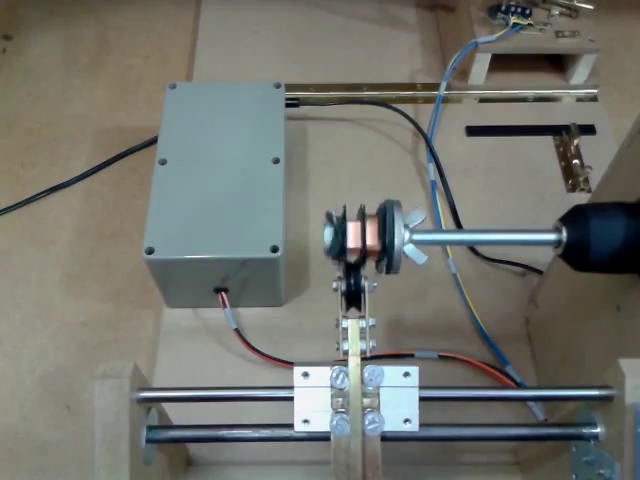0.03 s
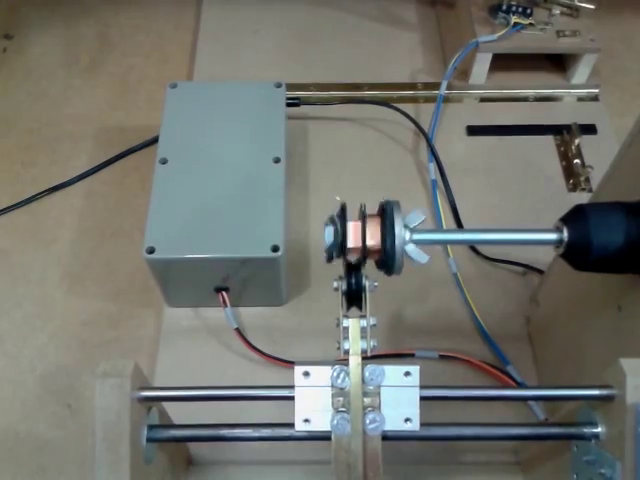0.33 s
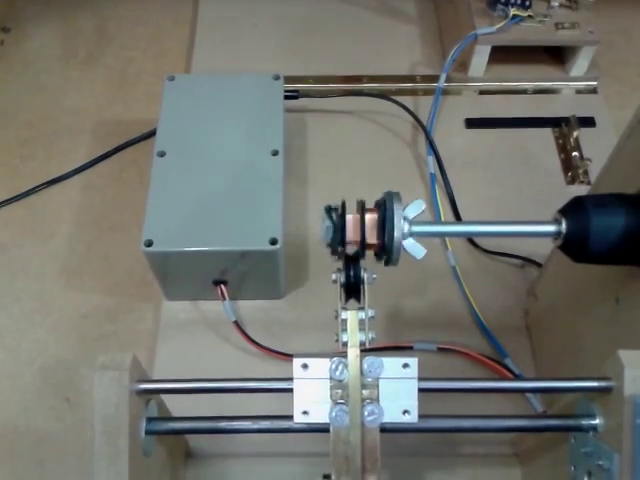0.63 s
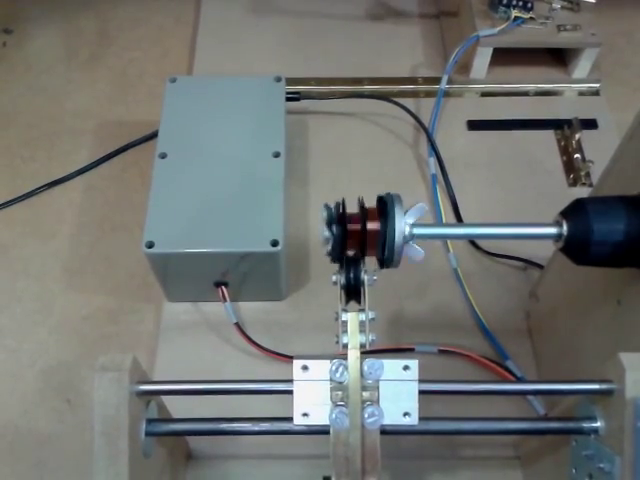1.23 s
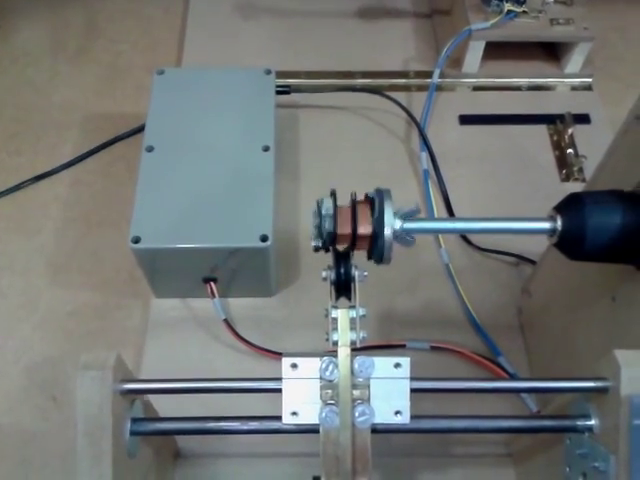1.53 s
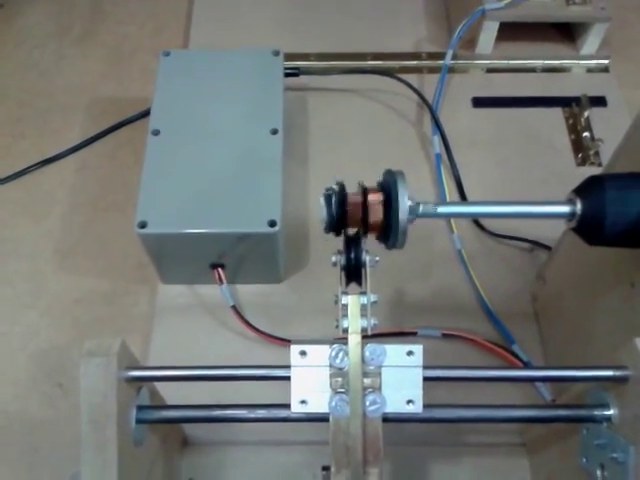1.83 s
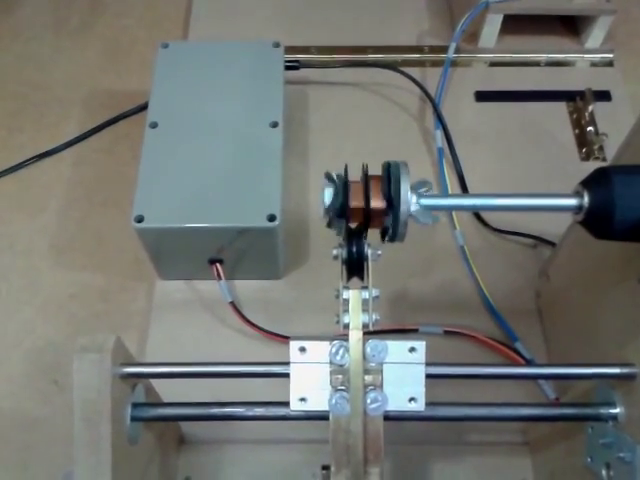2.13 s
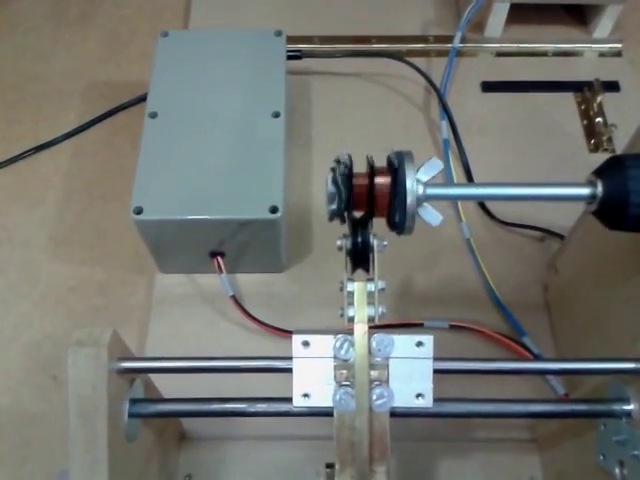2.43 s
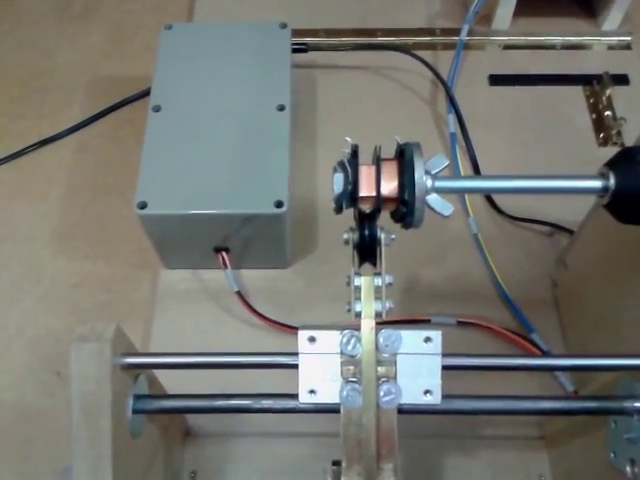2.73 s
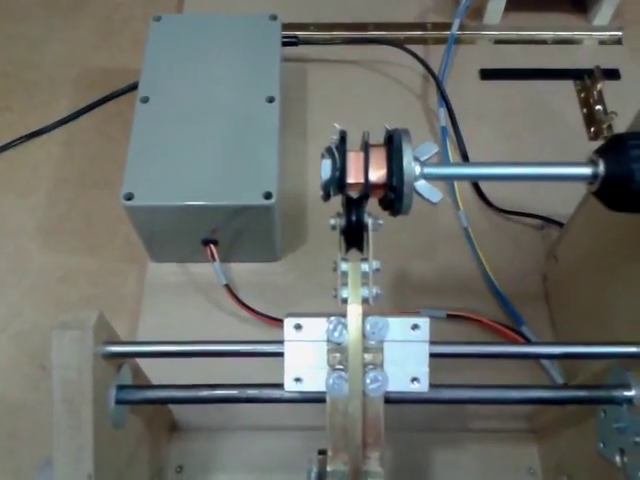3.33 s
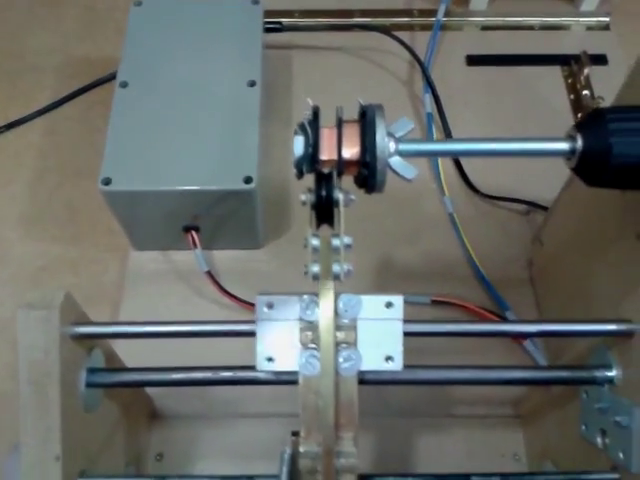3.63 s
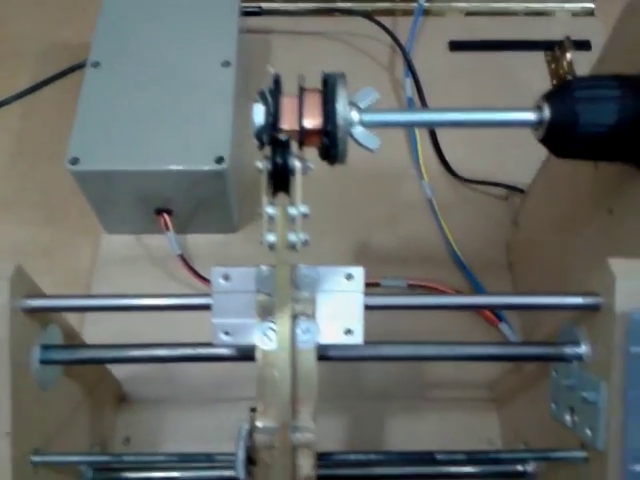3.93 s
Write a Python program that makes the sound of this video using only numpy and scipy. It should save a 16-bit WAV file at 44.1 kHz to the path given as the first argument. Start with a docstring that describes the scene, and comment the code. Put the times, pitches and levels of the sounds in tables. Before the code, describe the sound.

Close up in a small room, an electric drill whirs with gear rattle and hiss while winding wire. Its pitch drops step by step until it stops, then the mechanism clicks lightly a few times over quiet hum.

```python
"""An electric drill turns a coil bobbin in a wooden winding frame, slowing in steps, then running down.
Heard close up on one microphone in a small room: the motor whines, and gear teeth rattle and brushes
hiss through the resonances of housing and frame. The bobbin bumps round and the wire scrapes onto it.
Afterwards the stopped mechanism clacks and ticks a few times over the hum and hiss of the room."""
import sys
import numpy as np
from scipy import signal
from scipy.fft import rfft, irfft
from scipy.io import wavfile

SR = 44100
rng = np.random.default_rng(int(sys.argv[2]) if len(sys.argv) > 2 else 0)


def dump(signal):
    """Clip the signal to [-1, 1] and save it as 16-bit WAV at the path in sys.argv[1]."""
    limited = np.clip(np.atleast_2d(signal).T, -1, 1)
    pcm = np.round(limited * 32767).astype(np.int16)
    wavfile.write(sys.argv[1], SR, pcm)


N = 176400
T = np.arange(N) / SR

# The motor slowing. Each row: time in seconds, turns per second.
MOTOR_SPEED = [(0, 462), (.3, 460), (.41, 444), (.51, 421), (.65, 408), (.8, 409), (.97, 405), (1.08, 394),
               (1.2, 379), (1.33, 373), (1.72, 372), (1.82, 354), (1.95, 342), (2.41, 339), (2.48, 320),
               (2.56, 265), (2.7, 110)]
# Resonances of housing and frame, with narrow dips from where the microphone stands.
# Each row: centre in Hz, width in Hz, boost in dB.
BODY_RESONANCES = [(341.8, 47, 8.5), (415.4, 30, 2.5), (473, 33, -10.5), (544.7, 7.5, 9), (600.6, 23, 8),
                   (760, 82, 10.5), (810, 43, 5.5), (869, 87, 11), (1294, 63, 10.5), (1350, 6.7, -10),
                   (1438, 178, 8.5), (1523, 45, -7), (1720, 100, 7.5), (1843, 91, 9), (2270, 42, 1),
                   (2648, 52, 7), (2820, 60, 6), (3090, 180, 0), (3420, 40, 9)]
# Motor and gear tones. Each row: multiple of the motor speed, relative level in dB.
TONE_ORDERS = [(.4, -12.5), (.8, -14), (1.6, -17.5), (1.8667, -18), (3.1333, -24.5), (4.9333, -17.5),
               (5.2667, -26), (6, -13), (7, -17.5), (7.9333, -14)]

# How each whine swells and fades. Each row: time in seconds, level in dB.
MAIN_WHINE = [(0, -46), (.38, -35), (.45, -33), (.6, -28.5), (.68, -35.5), (.8, -30), (.97, -34),
              (1.05, -38.5), (1.13, -31.5), (1.38, -35), (1.5, -31.5), (1.7, -34.5), (1.82, -40),
              (1.95, -60), (2.48, -46)]
BEATING_WHINE = [(0, -41), (.36, -39), (.56, -56), (.72, -34), (.83, -54), (.95, -33), (1.2, -55),
                 (1.55, -40), (1.72, -47), (1.8, -57)]
MESH_DRONE = [(0, -41), (.33, -37), (.48, -49), (1.1, -51.5), (1.25, -48), (1.7, -47), (1.79, -35.5),
              (1.95, -42.5), (2.2, -39.5), (2.46, -42), (2.52, -46)]
GEAR_HUM = [(0, -49.5), (.3, -40.5), (.5, -53), (1.0, -57), (1.15, -45.5), (1.62, -43.5), (1.92, -52),
            (2.05, -47), (2.3, -42.5), (2.46, -56)]
MOTOR_HUM = [(.35, -45.5), (.45, -47.5), (.92, -41.5), (1.08, -43), (1.25, -66), (1.7, -56), (1.82, -44.5),
             (2.46, -41.5), (2.5, -50)]
THIRD_HARMONIC = [(.38, -45), (.46, -33), (.53, -48), (.82, -41), (.92, -51), (1.08, -48), (1.2, -52),
                  (1.65, -48), (1.85, -48)]
FOURTH_HARMONIC = [(.17, -51), (.3, -59), (.54, -57), (.61, -39.5), (.74, -47), (.81, -39), (.93, -61),
                   (1.04, -42), (1.15, -51), (2.45, -56)]
FIFTH_HARMONIC = [(.55, -49), (.62, -52), (.84, -40.5), (.95, -53), (1.15, -57), (1.23, -48), (1.9, -47.5),
                  (2.01, -43), (2.1, -72), (2.28, -43.5), (2.5, -47)]

# How hard each part sounds into housing and frame. Each row: time in seconds, relative level in dB.
TONE_LEVEL = [(.25, -34), (.6, -40), (1.5, -40), (1.8, -42.5), (2.45, -44.5), (2.52, -43)]
GEAR_LEVEL = [(0.0, -32.5), (1.12, -32.5), (1.13, -34.5), (1.56, -32), (1.81, -33), (2.38, -32.5),
              (2.64, -38.5), (2.7, -48)]
COAST_LEVEL = [(2.42, -68), (2.47, -43), (2.53, -47), (2.61, -49)]
BRUSH_LEVEL = [(0, -38), (.25, -36), (.9, -40), (2.42, -39.5), (2.56, -42), (2.63, -70), (2.7, -82)]

# The spectrum of each noise. Each row: frequency in Hz, relative density in dB.
GEAR_COLOUR = [(30, -30), (60, -6.5), (82, -19), (190, -17.5), (265, -15), (320, 2.5), (480, -3),
               (1000, -0.5), (1900, 0), (3000, -1), (4300, -5), (6300, -9.5), (7500, -23), (11000, -89)]
COAST_COLOUR = [(200, -28), (320, -1), (520, 3.5), (720, -8), (880, -3.5), (1050, -17), (2000, -34.5)]
BRUSH_COLOUR = [(1500, -7.5), (3500, -1.5), (4700, -2), (5250, 7.5), (5700, 6.5), (6250, 3), (7000, -5),
                (8200, -17), (9400, -14.5), (11000, -32.5), (15000, -28), (17000, -72)]
BOBBIN_COLOUR = [(25, -24), (58, -9.5), (82, -14), (110, -6.5), (200, -8.5), (330, -6), (600, 6.5),
                 (1200, -43)]
SCRAPE_COLOUR = [(500, -21), (1500, -11), (2700, 4), (5000, -7), (7000, -13), (11000, -42)]
CLACK_COLOUR = [(500, -12), (2400, 7), (4200, 5.5), (6300, 0), (8000, -15), (14000, -24)]
ROOM_COLOUR = [(25, -14), (50, -15.5), (125, -15.5), (200, -7.5), (270, -15), (320, -15.5), (410, -5),
               (490, -11), (600, -9.5), (930, -10.5), (1600, -9.5), (2000, -17), (4100, -15.5), (5400, -19),
               (7500, -29), (17000, -34)]

# Wire scraping on the bobbin. Each row: centre in seconds, length in seconds, relative level in dB.
WIRE_SCRAPES = [(0.809, 0.021, -33), (2.132, 0.066, -36.5)]
# The gears settling. Each row: start in seconds, level of the crack in dB, of the frame's knock in dB.
GEAR_CLACKS = [(2.733, -42, -42.5), (2.793, -37.5, -67)]
# Light metal ticks. Each row: start in seconds, relative level in dB.
METAL_TICKS = [(2.731, -47), (3.031, -50), (3.11, -40)]
# Their ring. Each row: frequency in Hz, relative level in dB, seconds to fall by 60 dB.
TICK_MODES = [(5360, 2, 0.048), (5400, -22, .12), (5420, -10, .025), (5900, -3, .03), (6600, -6, 0.018),
              (6650, -12, .02)]
# Hum in the room. Each row: frequency in Hz, level in dB.
ROOM_HUM = [(317, -59), (947, -62), (1211, -62.5)]

GEAR_CYCLE_TURNS, CONTACTS_PER_CYCLE = 15, 120


def drill(speed_jitter=.002):
    """The drill, close up: one motor speed drives tones, gears, brushes, bobbin and whines."""
    speed = in_time(MOTOR_SPEED) * (1 + speed_jitter * drift(13))
    turns = np.cumsum(speed) / SR
    return body(tones(turns) + gears(turns) + brushes(turns) + wire() + bobbin(turns)) + whines(turns)


def whines(turns):
    """The firm main whine and drone among rougher tones; neighbours beat once per gear cycle."""
    slip = 1 / GEAR_CYCLE_TURNS
    firm = [(MAIN_WHINE, 2), (BEATING_WHINE, 2 - slip), (MESH_DRONE, 6 / 5)]
    rough = [(GEAR_HUM, 1 - slip), (MOTOR_HUM, 1),
             (THIRD_HARMONIC, 3), (FOURTH_HARMONIC, 4), (FIFTH_HARMONIC, 5)]
    return (sum(whine(turns, level, order, flutter_db=2.1) for level, order in firm)
            + sum(whine(turns, level, order, flutter_db=3.2) for level, order in rough))


def whine(turns, level, order, flutter_db):
    """A wavering tone at `order` times the motor speed."""
    waver = rms_one(from_db(flutter_db * drift(25)))
    return running(level) * waver * np.sqrt(2) * np.sin(2 * np.pi * (order * turns + rng.random()))


def tones(turns, flutter_db=4.5, low_cut_hz=249):
    """Wavering motor and gear tones that fall with the speed and die as the power goes off."""
    out = np.zeros(N)
    for multiple, db in TONE_ORDERS:
        order = np.round(multiple * GEAR_CYCLE_TURNS) / GEAR_CYCLE_TURNS  # whole waves per gear cycle
        gain = from_db(db + flutter_db * drift(27))
        out += gain * np.sin(2 * np.pi * (order * turns + rng.random()))
    return running(TONE_LEVEL) * np.sqrt(2) * cut(out, 4, low_cut_hz, "high")


def gears(turns, click_db=5, rub_pulsing=.099, loaded_db=-3, flicker_db=1.22):
    """Teeth click and rub under load, then chatter in their play as the motor coasts."""
    rattle = from_db(click_db) * tooth_clicks(turns) + pulsing_noise(turns, rub_pulsing)
    gain = running(GEAR_LEVEL) * from_db(loaded_db + flicker_db * drift(12))
    loaded = gain * colour(frame_echo(rattle), GEAR_COLOUR)
    coasting = running(COAST_LEVEL) * colour(rattle, COAST_COLOUR)
    return loaded + coasting


def tooth_clicks(turns, spread_db=1.8, scatter_db=1.3):
    """Uneven teeth click in a pattern that repeats each gear cycle; rms 1."""
    offset = rng.random(CONTACTS_PER_CYCLE)
    size = from_db(spread_db * rng.standard_normal(CONTACTS_PER_CYCLE))
    size *= rng.choice([-1, 1], CONTACTS_PER_CYCLE)
    passed = turns / GEAR_CYCLE_TURNS * CONTACTS_PER_CYCLE
    contact = np.arange(int(passed[-1]) - 1)
    tooth = contact % CONTACTS_PER_CYCLE
    clicks = np.zeros(N)
    clicks[np.searchsorted(passed, contact + offset[tooth])] = size[tooth]
    return rms_one(clicks * from_db(scatter_db * rng.standard_normal(N)))


def brushes(turns, gain_db=1.5, flicker_db=1.4):
    """Brushes hiss on the commutator, pulsing once per turn."""
    sparks = pulsing_noise(turns, depth=.35)
    gain = running(BRUSH_LEVEL) * from_db(gain_db + flicker_db * drift(12))
    return gain * colour(frame_echo(sparks), BRUSH_COLOUR)


def bobbin(turns, turns_per_bump=66.5, first_bump_turns=19.3, gain_db=-50):
    """A dull bump each time the bobbin comes round."""
    bump = np.cos(np.pi * (turns - first_bump_turns) / turns_per_bump) ** 8
    drive = running(GEAR_LEVEL)
    return from_db(gain_db) * drive / drive.max() * rms_one(bump) * noise(BOBBIN_COLOUR)


def wire(tick_s=1.115, tick_db=-47):
    """Brief scrapes and one bright tick as the wire runs onto the bobbin."""
    swells = sum(from_db(db) * np.exp(-(2 * (T - s) / length) ** 2) for s, length, db in WIRE_SCRAPES)
    scrapes = swells * noise(SCRAPE_COLOUR)
    tick = ringing_noise(hz=10900, width_hz=1100) * decay(tick_s, t60=.07)
    return scrapes + from_db(tick_db) * tick


def body(x):
    """Housing and frame resonate; interference where the microphone stands adds narrow dips."""
    bins = np.arange(N + 1) * SR / (2 * N)
    gain_db = sum(db / (1 + ((bins - hz) / (0.44 * width)) ** 2) for hz, width, db in BODY_RESONANCES)
    return irfft(rfft(x, 2 * N) * from_db(gain_db))[:N]


def frame_echo(x, echo_db=-6, low_cut_hz=2000):
    """Dense short reflections between the boards of the frame."""
    tail = (rng.standard_normal(N) * decay(0, t60=.035))[:SR // 4]
    tail = cut(tail, 2, low_cut_hz, "high")
    return x + from_db(echo_db) * signal.fftconvolve(x, tail / np.linalg.norm(tail))[:N]


def clacks():
    """The gears drop back into their play and knock on the frame."""
    crack = noise(CLACK_COLOUR)
    knock = ringing_noise(hz=810, width_hz=27)
    out = np.zeros(N)
    for start, crack_db, knock_db in GEAR_CLACKS:
        out += from_db(crack_db) * crack * decay(start, t60=.035)
        out += from_db(knock_db) * knock * decay(start, t60=.14)
    return out


def ticks(touches=4, bounce_s=.0037, bounce_loss_db=2.5, top_hz=7500):
    """A small metal part touches, bounces and rings."""
    out = np.zeros(N)
    for start, db in METAL_TICKS:
        for bounce in range(touches):
            at = start + bounce * bounce_s * rng.uniform(0.71, 1.2)
            for hz, mode_db, t60 in TICK_MODES:
                gain = from_db(db + mode_db - bounce * bounce_loss_db)
                out += gain * decay(at, t60) * np.sin(2 * np.pi * hz * (T - at))
    return cut(out, 4, top_hz, "low")


def room(hiss_db=-48.5, waver_radians=.83):
    """Room tone behind the drill: steady hiss with a slightly wavering hum."""
    hum = sum(from_db(db) * np.sqrt(2) * np.sin(2 * np.pi * hz * T + waver_radians * drift(2.7))
              for hz, db in ROOM_HUM)
    return from_db(hiss_db) * noise(ROOM_COLOUR) + hum


def from_db(db):
    """Decibels to gain."""
    return 10 ** (np.asarray(db) / 20)


def rms_one(x):
    """Scale to rms 1."""
    return x / np.sqrt(np.mean(x ** 2) + 1e-20)


def in_time(rows):
    """A curve at every sample."""
    return np.interp(T, *np.transpose(rows))


def running(rows, fall_db_per_s=390):
    """Gain from a level curve, dying quickly after its last point."""
    return from_db(in_time(rows) - fall_db_per_s * np.maximum(T - rows[-1][0], 0))


def decay(start, t60):
    """Envelope of a blow, falling 60 dB in t60 seconds."""
    return (T >= start) * from_db(-60 * np.clip((T - start) / t60, 0, 4))


def drift(rate_hz, hop=40, warm_up=2000):
    """Slow random wander, rms 1."""
    pole = np.exp(-2 * np.pi * rate_hz * hop / SR)
    white = rng.standard_normal(N // hop + warm_up + 2)
    slow = signal.lfilter([1], [1, -2 * pole, pole * pole], white)[warm_up:]
    return np.interp(np.arange(N) / hop, np.arange(len(slow)), rms_one(slow))


def cut(x, order, hz, keep):
    """Filter that keeps the "high" or "low" side of hz."""
    return signal.sosfilt(signal.butter(order, hz, keep, fs=SR, output="sos"), x)


def colour(x, points):
    """Shape by a smooth spectrum; rms 1."""
    hz, db = np.transpose(points)
    bins = np.maximum(np.arange(N // 2 + 1) * SR / N, 1)
    gain = from_db(np.interp(np.log(bins), np.log(hz), db))
    return rms_one(irfft(rfft(x) * gain, N))


def noise(points):
    """Coloured noise, rms 1."""
    return colour(rng.standard_normal(N), points)


def pulsing_noise(turns, depth):
    """White noise that swells once per motor turn."""
    return rng.standard_normal(N) * (1 + depth * np.cos(2 * np.pi * turns))


def ringing_noise(hz, width_hz):
    """Noise through a two-pole resonance, rms 1."""
    radius = np.exp(-np.pi * width_hz / SR)
    feedback = [1, -2 * radius * np.cos(2 * np.pi * hz / SR), radius * radius]
    return rms_one(signal.lfilter([1, 0, -1], feedback, rng.standard_normal(N)))


def scene():
    """The drill and its last clicks in front, the room behind, in mono."""
    return (drill() + clacks() + ticks() + room())[None]


def record(dry, stop_hz=17500):
    """The microphone chain cuts the top steeply."""
    return signal.sosfiltfilt(signal.cheby2(14, 50, stop_hz, fs=SR, output="sos"), dry)


dry = scene()
out = record(dry)
dump(out)
```